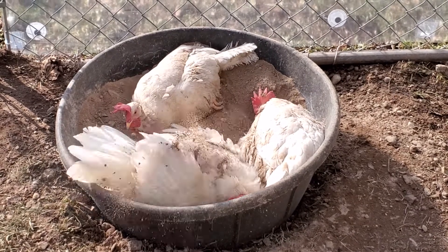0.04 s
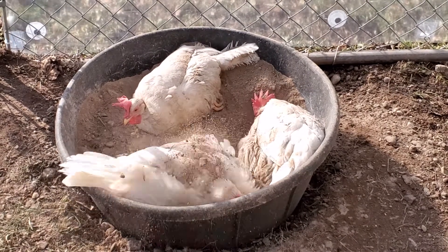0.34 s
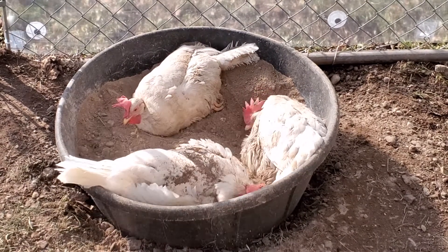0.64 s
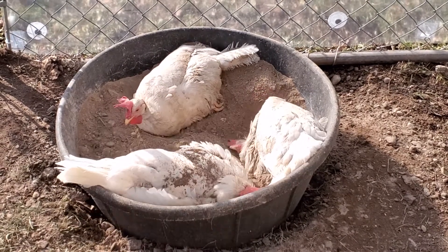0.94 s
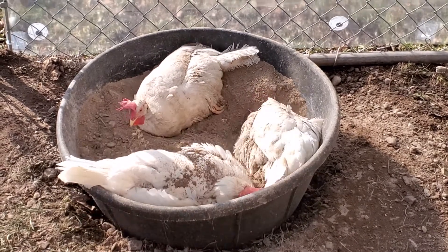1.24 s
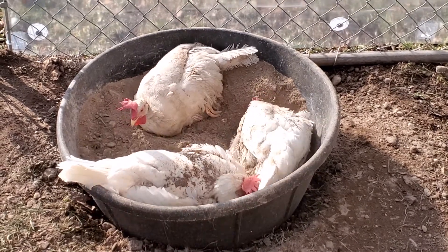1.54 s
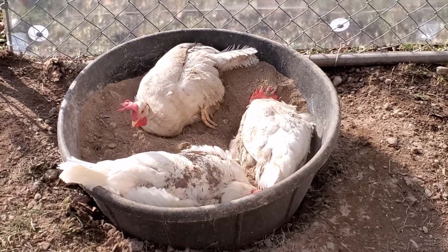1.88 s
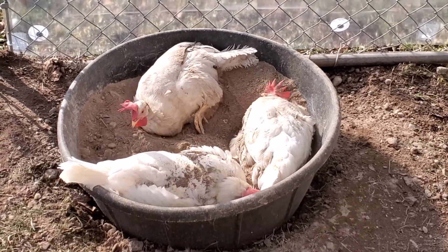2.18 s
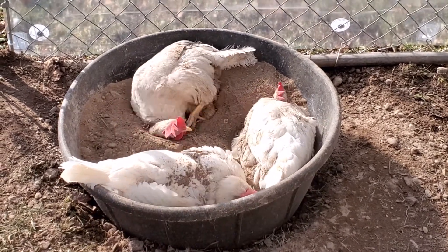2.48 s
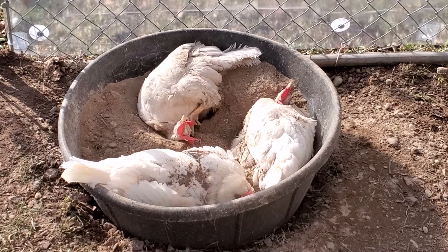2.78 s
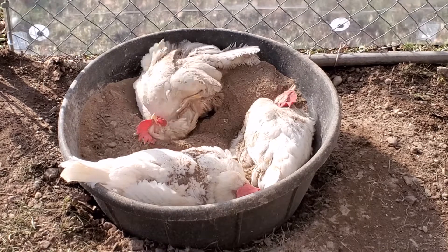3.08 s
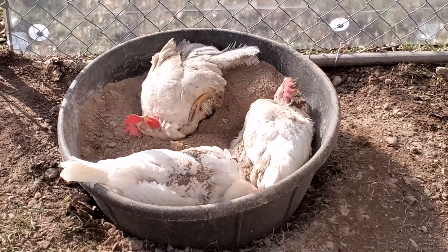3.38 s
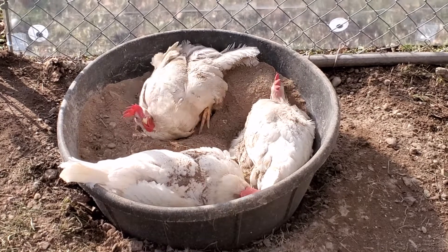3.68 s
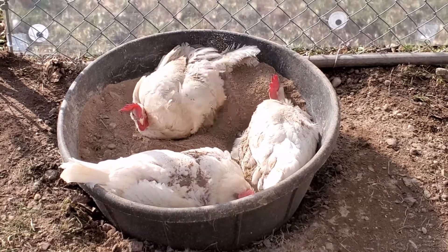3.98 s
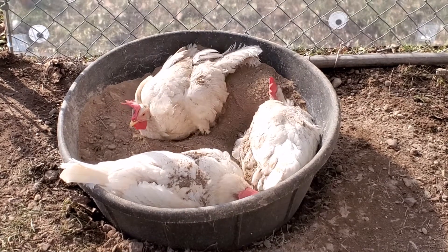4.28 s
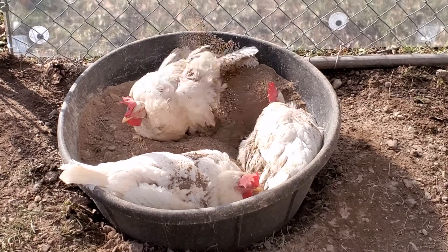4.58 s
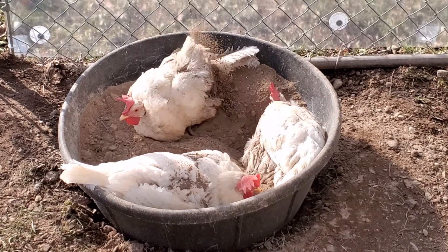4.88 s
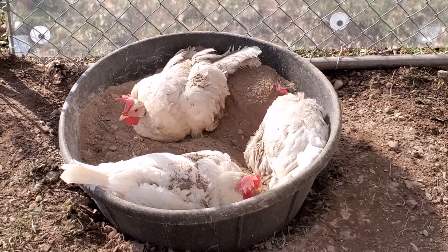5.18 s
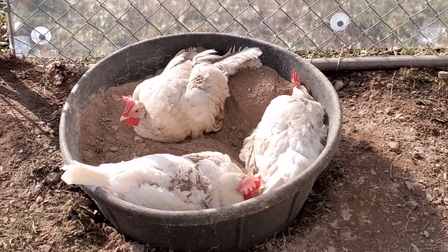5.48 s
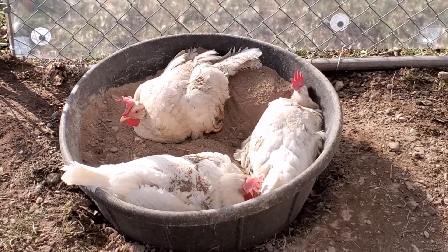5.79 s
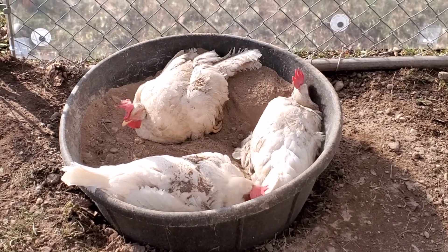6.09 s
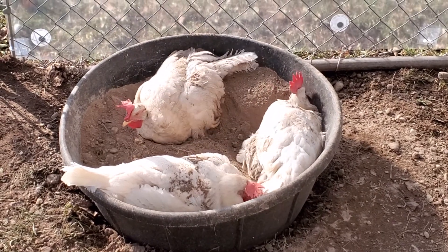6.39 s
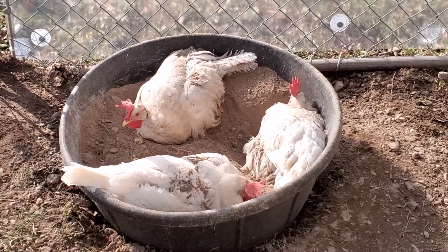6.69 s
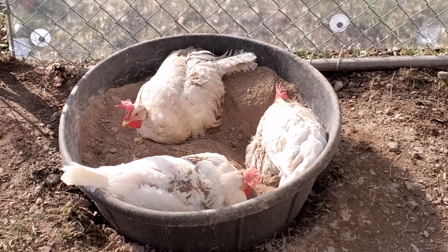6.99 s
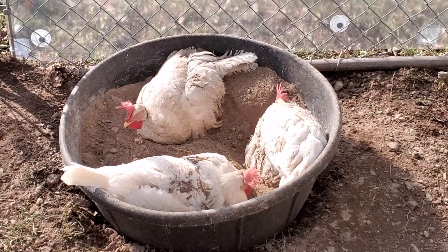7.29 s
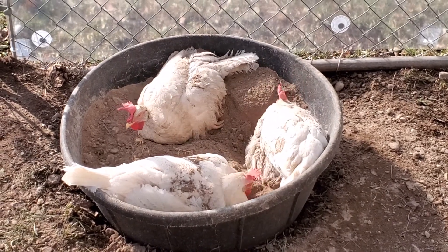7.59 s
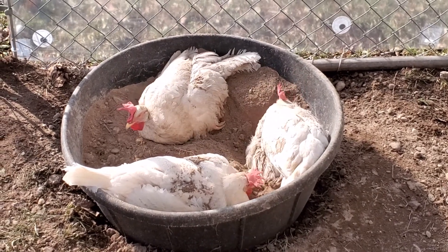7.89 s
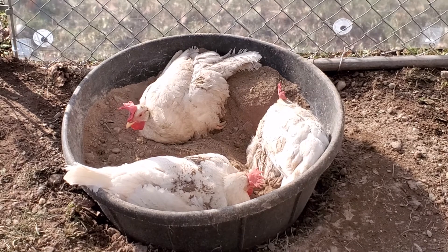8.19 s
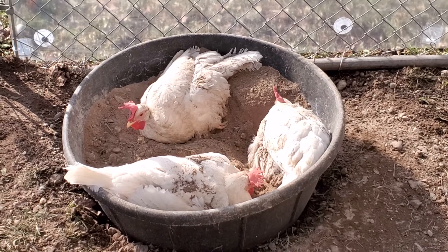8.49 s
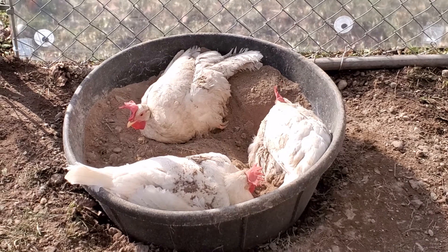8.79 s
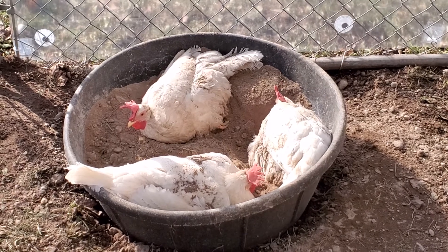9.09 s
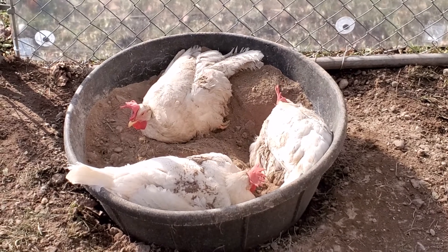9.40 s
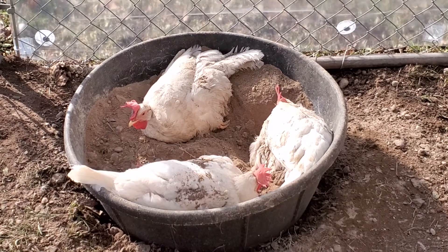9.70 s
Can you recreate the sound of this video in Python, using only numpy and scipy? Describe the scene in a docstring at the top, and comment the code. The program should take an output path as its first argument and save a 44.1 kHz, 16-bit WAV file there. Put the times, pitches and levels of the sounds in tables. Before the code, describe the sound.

Low gusts thump on the microphone, then fade, leaving a far traffic hum and chickens scratching in dry dirt.

```python
"""Dry dirt hisses through feathers over the hum of distant traffic, and a breeze buffets the left mic port.
Three hens are dust-bathing outdoors in a rubber tub: bodies rustle, feet and wings scuff the dirt,
shaken feathers spray it, and crumbs tick on the tub. The wind dies halfway, a far car swells past,
and a beak pecks. The scuffing is busiest near the end, where a foot knocks dully on the rubber wall.
The dirt is built from showers of tiny impacts, the wind from low noise and single pushes of pressure."""
import sys
import numpy as np
from scipy import signal
from scipy.fft import rfft, irfft, next_fast_len
from scipy.io import wavfile

SR = 44100
rng = np.random.default_rng(int(sys.argv[2]) if len(sys.argv) > 2 else 0)


def inscribe(sig):
    """Save sig as 16-bit PCM at rate SR to the path in sys.argv[1].

    A 1-D sig is mono; a 2-D sig holds one channel per row.
    Samples are clipped to [-1, 1] before scaling.
    """
    pcm = np.round(np.clip(np.atleast_2d(sig).T, -1, 1) * 32767)
    wavfile.write(sys.argv[1], SR, pcm.astype(np.int16))


N = 434385
TIME = np.arange(N) / SR
PUFF_ATTACK_S, PUFF_RELEASE_S = 0.013, 0.035

# Tone of the traffic bed. Each row: frequency in Hz, gain in dB.
TRAFFIC_EQ = [(15, -2.5), (30, -14.5), (55, 2.5), (80, 4.5), (135, -6), (320, -6), (470, -12), (820, -11),
              (1080, -14.5), (1700, -12.5), (2400, -24.5), (3000, -27), (5000, -38.5), (10000, -58.5),
              (16000, -58)]
# Its slow swell. Each row: time in seconds, relative level in dB.
TRAFFIC_SWELL = [(0.0, -49), (4.85, -49.5), (9.85, -48)]
# Its stereo width. Each row: frequency in Hz, likeness of the two ports from -1 to 1.
PORT_LIKENESS = [(60, 0), (130, 0.9), (290, 0.86), (640, 0.39), (1300, -0.09), (3000, 0.25), (7000, 0)]
# Dirt as the tub colours it. Each row: frequency in Hz, gain in dB.
TUB_EQ = [(100, -24), (250, -4), (450, 5), (750, 4.5), (950, 1.5), (1400, 2.5), (1950, -0.5), (2400, -8),
          (3100, -3), (3900, -18), (6000, -20), (10000, -61), (16000, -44)]
# The hens shifting in the dirt. Each row: time in seconds, relative level in dB.
BODY_MOTION = [(0, -57), (.7, -66), (4.5, -64.5), (5.1, -55), (5.6, -67), (6.6, -59.5), (9.15, -57.5),
               (9.5, -48), (9.85, -53)]
# Fizz of fine dust. Each row: frequency in Hz, gain in dB.
DUST_EQ = [(800, -29), (2500, -3), (4000, 5), (6500, 1), (8300, 4.5), (9800, -6.5), (12500, 0.5),
           (15500, 1.5)]
# Dirt tossed through feathers. Each row: peak time in seconds, relative level in dB, length in seconds.
DIRT_TOSSES = [(0, -49.5, 0.064), (0.15, -52.5, 0.073), (.26, -57, 0.049), (.5, -65, 0.13),
               (2.706, -69, 0.16), (4.295, -53, 0.041), (4.79, -57.5, 0.14), (5.082, -52.5, 0.1),
               (5.257, -53, 0.041), (5.335, -58.5, 0.035), (6.48, -64, 0.065)]
# Wind rumble on a port. Each row: frequency in Hz, gain in dB.
WIND_EQ = [(10, -26), (30, -1), (58, 3), (95, -1), (140, -11), (260, -23), (450, -30), (900, -50),
           (2000, -104)]
# Light breeze between puffs. Each row: time in seconds, relative level in dB.
BREEZE_LEVEL = [(0, -51), (.9, -28.5), (2.4, -40), (3.2, -43.5), (4.1, -43), (4.8, -46)]
# Puffs of wind. Each row: start in seconds, hold in seconds, relative level in dB, front sharpness in Hz.
WIND_PUFFS = [(0.146, 0.033, -22.5, 260), (0.234, 0.011, -24, 280), (0.386, 0.0092, -27.5, 109),
              (0.552, 0.24, -22, 410), (0.79, 0.01, -17, 298), (0.846, 0.037, -17.5, 481),
              (1.131, 0.053, -22.5, 290), (1.186, 0.026, -21.5, 332), (1.452, .06, -27, 298),
              (1.621, 0.017, -27, 344), (1.728, 0.017, -26, 400), (1.856, 0.12, -24.5, 540),
              (1.997, 0.11, -17.5, 240), (2.166, .11, -29.5, 512), (2.624, 0.27, -34, 400),
              (3.32, 0.021, -27, 110), (3.574, 0.022, -23.5, 167), (3.664, .02, -27.5, 382),
              (3.782, 0.055, -27.5, 345), (3.898, 0.13, -30.5, 336), (4.323, 0.015, -29.5, 130)]
# Strokes of foot or wing. Each row: peak time in seconds, relative level in dB, length in seconds,
# grit against the body of the stroke in dB.
STROKES = [(0.459, -44, 0.032, -24), (0.912, -38, .03, -15.5), (1.807, -38, 0.012, -34),
           (3.953, -37, 0.034, -19.5), (4.285, -44.5, 0.047, -14), (4.581, -44, 0.012, -23),
           (6.812, -47, .026, -9.5), (7.683, -42, 0.057, -28), (7.945, -40, 0.065, -11.5),
           (8.002, -41.5, 0.057, -11), (8.078, -39.5, 0.033, -34), (8.162, -40, 0.019, -15.5),
           (8.368, -41.5, 0.035, -14.5), (8.487, -41.5, 0.045, -16.5), (8.682, -45.5, 0.073, -17),
           (8.82, -44.5, 0.06, -15.5), (8.907, -37.5, 0.033, -16), (8.948, -36.5, 0.029, -13.5),
           (9.51, -35.5, 0.034, -17.5), (9.538, -30, .016, -11.5), (9.722, -44.5, 0.041, -9.5),
           (9.771, -48.5, .03, -6)]
# Gritty top of a stroke. Each row: frequency in Hz, gain in dB.
GRIT_EQ = [(1500, -14), (3500, 11.5), (5500, 4), (8300, 1), (9800, -3), (12500, -1.5), (16000, -13)]
# High ticks of crumbs landing, and lower taps of a beak pecking.
# Each row: start in seconds, relative level in dB, ring in Hz.
CRUMBS_AND_PECKS = [(.561, -47, 13500), (.638, -51, 12990), (5.24, -41, 12500), (5.334, -44, 13500),
                    (5.395, -54, 12000), (6.405, -41.5, 4180), (6.451, -54, 6000), (6.616, -54, 5500),
                    (6.718, -49, 5000), (7.89, -45, 6870)]
# A foot hitting the tub wall. Each row: time in seconds, relative level in dB.
WALL_BUMPS = [(4.265, -39), (8.909, -29), (9.532, -26.5)]
# Stereo tilt of the ports. Each row: frequency in Hz, left minus right in dB.
PORT_BALANCE = [(200, -.5), (400, -0.5), (1200, 0), (2400, 3), (4400, 2), (15000, 4.5)]


def amp(db):
    return 10 ** (np.asarray(db) / 20)


def unit_rms(x):
    return x / np.sqrt(np.mean(x ** 2) + 1e-20)


def curve_at(points, hz):
    """A spectrum table, joined by straight lines over log frequency."""
    f, value = np.transpose(points)
    return np.interp(np.log(hz + 1), np.log(f + 1), value)


def fader(points):
    """A dB curve as a gain for every sample."""
    return amp(np.interp(TIME, *np.transpose(points)))


def eq(x, points):
    """Filters x by a table of (Hz, dB)."""
    size = next_fast_len(x.shape[-1] + 2048)
    gain = amp(curve_at(points, np.fft.rfftfreq(size, 1 / SR)))
    return irfft(rfft(x, size) * gain, size)[..., :x.shape[-1]]


def butter(x, order, hz, kind):
    return signal.sosfilt(signal.butter(order, hz, kind, fs=SR, output="sos"), x)


def resonate(x, hz, q):
    """One resonance of gain 1."""
    return signal.lfilter(*signal.iirpeak(hz, q, fs=SR), x)


def drift(size, hz):
    """A random wobble that finds a new value hz times a second."""
    at = np.arange(size) * hz / SR
    count = int(at[-1]) + 2
    return np.interp(at, np.arange(count), rng.standard_normal(count))


def envelope(t, attack_s, hold_s, release_s):
    """Swells up to t = 0, holds, then dies away."""
    return np.exp(-(np.minimum(t, 0) / attack_s) ** 2 / 2 - np.maximum(t - hold_s, 0) / release_s)


def grains(size, per_s, spread_db):
    """Tiny uneven impacts; each reaches the two ports with its own strength and sign."""
    hits = rng.random(size) < per_s / SR
    weights = amp(spread_db * np.minimum(rng.exponential(1, size), 4))
    return unit_rms(hits * weights * rng.standard_normal((2, size)))


def add(mix, s, sound):
    """Mixes a sound in at s seconds."""
    part = mix[..., max(round(s * SR), 0):][..., :sound.shape[-1]]
    part += sound[..., :part.shape[-1]]


def traffic(level_db=8.5, waver_db=0.4):
    """A diffuse far roar: nearly alike at both ports in the upper bass, wide in the treble."""
    left, unrelated = rfft(rng.standard_normal((2, N)))
    likeness = curve_at(PORT_LIKENESS, np.fft.rfftfreq(N, 1 / SR))
    right = likeness * left + np.sqrt(1 - likeness ** 2) * unrelated
    roar = unit_rms(eq(irfft([left, right], N), TRAFFIC_EQ))
    return roar * fader(TRAFFIC_SWELL) * amp(level_db + waver_db * drift(N, 5))


def body_rustle(clump_db=3.5, grit_db=-9):
    """Feathers and dirt crunch softly under the shifting bodies."""
    crunch = grains(N, per_s=2500, spread_db=1.1)
    body = unit_rms(eq(crunch, TUB_EQ))
    grit = amp(grit_db) * unit_rms(resonate(crunch, hz=3020, q=1.97))
    return (body + grit) * fader(BODY_MOTION) * amp(clump_db * drift(N, 30))


def dirt_spray(clump_db=1.3, trickle_db=-76, waver_db=2):
    """Fine dirt sifts through feathers and rains back in clumps at each toss; a little always trickles."""
    sand = unit_rms(eq(grains(N, per_s=5000, spread_db=1.2), DUST_EQ))
    flow = sum(amp(db) * envelope(TIME - s, 0.49 * length, 0, length) for s, db, length in DIRT_TOSSES)
    trickle = amp(trickle_db + waver_db * drift(N, 9))
    return sand * np.hypot(flow, trickle) * amp(clump_db * drift(N, 69))


def wind_rumble(lee_db=-14, lump_db=1, calm_at_s=4.64, chop_db=-16, chop_band_hz=(140, 386.4)):
    """Turbulence rumbles at each port on its own, the right one in the lee; strong gusts turn choppy."""
    puffs = [amp(db) * envelope(TIME - s, PUFF_ATTACK_S, hold, PUFF_RELEASE_S)
             for s, hold, db, _ in WIND_PUFFS]
    fade_out = np.clip((calm_at_s - TIME) / 0.5, 0, 1)
    strength = np.max(puffs + [fader(BREEZE_LEVEL)], axis=0) * fade_out
    rumble = unit_rms(eq(rng.standard_normal((2, N)), WIND_EQ)) * amp(lump_db * drift(N, 40))
    small_eddies = unit_rms(butter(rng.standard_normal((2, N)), 3, chop_band_hz, "band"))
    chop = small_eddies * rumble * np.sqrt(strength / strength.max())  # they ride on the large ones
    return (rumble + amp(chop_db) * chop) * strength * amp([[0], [lee_db]])


def eddy(hz, ragged=0.15):
    """One push of pressure, 40 ms long, peaking in the middle; higher hz makes it sharper."""
    t = np.arange(-SR // 50, SR // 50) / SR
    return np.hanning(len(t)) * (1 + ragged * drift(len(t), 2 * hz)) / (1 + (np.pi * hz * t) ** 2)


def wind_buffets(front_db=12.5, wake_db=4, spread_db=2.5, wake_hz=300, gap_s=0.04, lee_db=-24):
    """An eddy leads each puff, the sharper the harder, and weaker ones follow while it holds."""
    out = np.zeros(N)
    for s, hold, db, hz in WIND_PUFFS:
        start = s - 0.02  # puts the eddy's peak on the puff
        steepness = (hz / 370) ** 0.66
        add(out, start, amp(db + front_db) * steepness * eddy(hz))
        for k in range(6):
            delay = gap_s * (k + 1 - rng.random() / 2)
            push = rng.choice([-1, 1]) * amp(db + wake_db + spread_db * rng.standard_normal())
            push *= envelope(delay, PUFF_ATTACK_S, hold, PUFF_RELEASE_S)
            add(out, start + delay, push * eddy(wake_hz))
    thumps = butter(out, 3, hz=60, kind="high")  # the mic's bass cut makes each push swing back
    return butter(thumps, 4, hz=760, kind="low") * amp([[0], [lee_db]])


def wing_shake(peak_s=0.19, half_length_s=0.14, level_db=-52, low_cut_hz=11475):
    """The nearest hen shakes her wings, and the dusty vanes hiss against each other."""
    vanes = butter(grains(N, per_s=3000, spread_db=1.8), 3, low_cut_hz, "high")
    return vanes * amp(level_db) * np.exp(-((TIME - peak_s) / half_length_s) ** 4)


def scuffs(hollow_db=1, hollow_hz=2150, usual_db=-42, db_per_octave=15, catch_db=1.1, dust_db=-8):
    """Dirt shears under a stroke that catches and slips; gritty strokes raise fine dust."""
    out, t = np.zeros((2, N)), np.arange(-SR // 4, SR // 4) / SR
    for s, db, length, grit_db in STROKES:
        stroke = envelope(t, 0.32 * length, 0, 0.85 * length) * amp(catch_db * drift(len(t), 213.7))
        body = unit_rms(eq(grains(len(t), per_s=6000, spread_db=3.3), TUB_EQ))
        ring_hz = hollow_hz * 2 ** ((usual_db - db) / db_per_octave)  # heavier sounds lower in the tub
        body = unit_rms(body + amp(hollow_db) * resonate(body, ring_hz, q=4))
        grit = unit_rms(eq(grains(len(t), per_s=3000, spread_db=2.1), GRIT_EQ))
        dust = amp(dust_db) * unit_rms(eq(grains(len(t), per_s=4100, spread_db=2.2), DUST_EQ))
        add(out, s + t[0], amp(db) * stroke * (body + amp(grit_db) * (grit + dust)))
    return out


def crumbs_and_pecks(level_db=3, attack_s=0.00091, ring_s=0.0042, scatter_db=-11, scatter_s=0.026,
                     small_count=30, small_db=-5, low_hz=4200, high_hz=12000):
    """A crumb or beak ticks and scatters grains; small crumbs fall at random, louder as the hens stir."""
    out, t = np.zeros((2, N)), np.arange(SR // 8) / SR
    small_crumbs = []
    for s in rng.uniform(0, N / SR, small_count):
        motion_db = np.interp(s, *np.transpose(BODY_MOTION))
        small_crumbs.append((s, motion_db + small_db, low_hz * (high_hz / low_hz) ** rng.random()))
    attack = np.minimum(t / attack_s, 1)
    for s, db, hz in CRUMBS_AND_PECKS + small_crumbs:
        tick = rng.standard_normal((2, len(t))) * np.exp(-t / ring_s)
        burst = grains(len(t), per_s=2800, spread_db=2.5) * amp(scatter_db) * np.exp(-t / scatter_s)
        add(out, s, amp(db + level_db) * resonate((tick + burst) * attack, hz, q=2.4))
    return out


def wall_knocks(level_db=-2, hz=380, q=1.05, attack_s=0.00093, decay_s=0.0045):
    """The soft rubber wall answers a foot with a dull knock that dies at once."""
    blows = sum(amp(db + level_db) * envelope(TIME - s, attack_s, 0, decay_s) for s, db in WALL_BUMPS)
    rubber = resonate(eq(rng.standard_normal((2, N)), TUB_EQ), hz, q)
    return blows * unit_rms(rubber)


def passing_car(peak_s=5.2, swell_s=0.6, level_db=-51, band_hz=(226.7, 435.2)):
    """One far car swells out of the traffic as a dull roar."""
    roar = unit_rms(butter(rng.standard_normal(N), 2, band_hz, "band"))
    return roar * amp(level_db) * np.exp(-((TIME - peak_s) / swell_s) ** 2)


def yard_echoes(x, wet_db=-9, t60_s=0.43, predelay_s=0.002):
    """Short scattered echoes from tub wall, ground and fence."""
    t = np.arange(SR // 3) / SR
    taps = grains(len(t), per_s=2000, spread_db=0) * amp(-60 * t / t60_s) * (t > predelay_s)
    taps /= np.linalg.norm(taps, axis=1, keepdims=True)
    return x + amp(wet_db) * signal.fftconvolve(x, taps, axes=1)[:, :N]


def scene():
    """Hens and traffic sound brighter on the left; the wind hits the ports directly."""
    hens = scuffs() + wall_knocks() + body_rustle() + dirt_spray() + wing_shake() + crumbs_and_pecks()
    air = yard_echoes(hens) + traffic() + passing_car()
    left = eq(air[0], [(hz, db / 2) for hz, db in PORT_BALANCE])
    right = eq(air[1], [(hz, -db / 2) for hz, db in PORT_BALANCE])
    return np.array([left, right]) + wind_rumble() + wind_buffets()


def record(dry):
    """The recorder's band limit: a steep cut of the very top."""
    low_pass = signal.firwin(511, cutoff=15850, window=("kaiser", 9), fs=SR)
    return signal.oaconvolve(dry, low_pass[None], "same")


dry = scene()
out = record(dry)
inscribe(out)
```